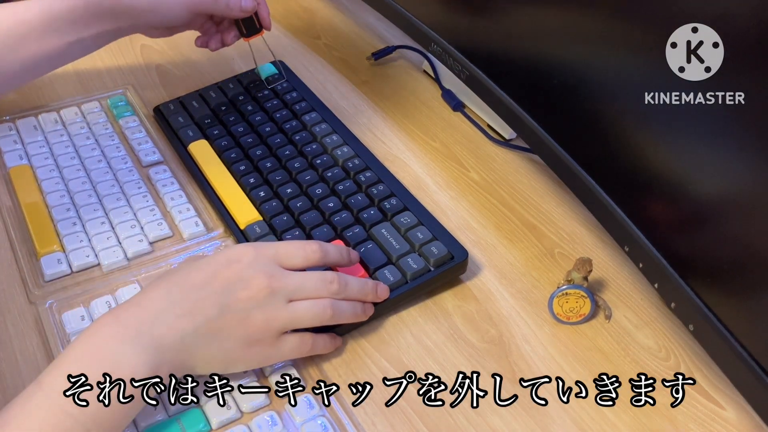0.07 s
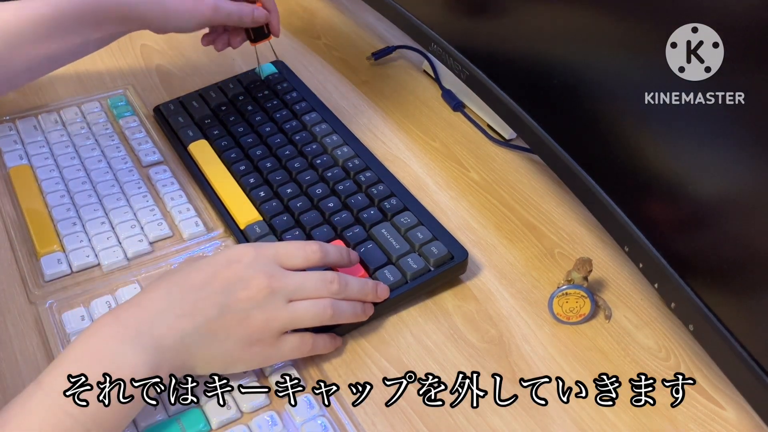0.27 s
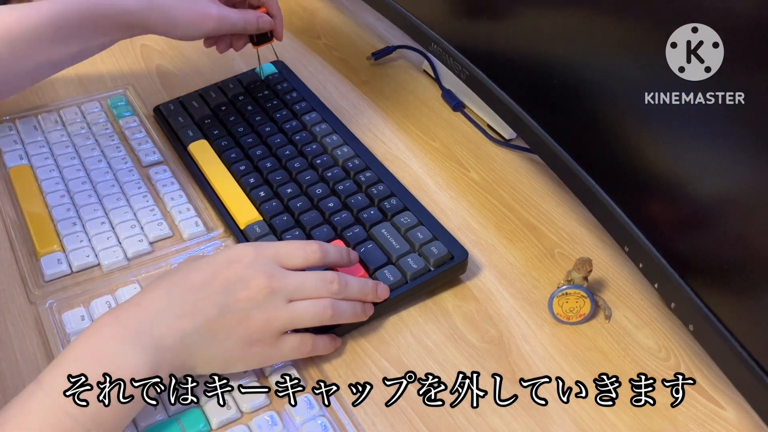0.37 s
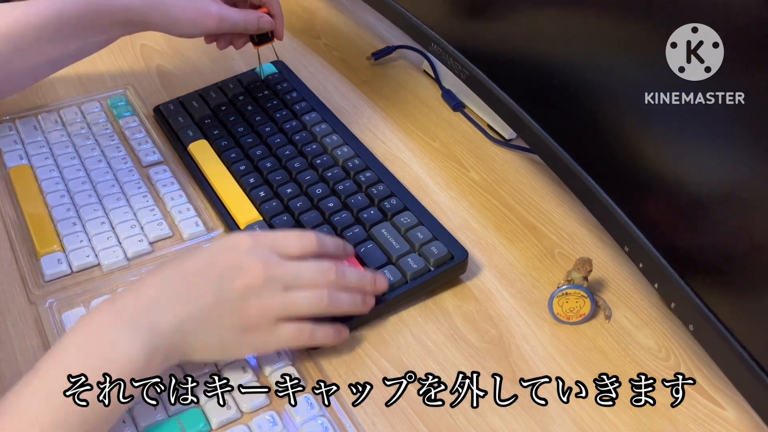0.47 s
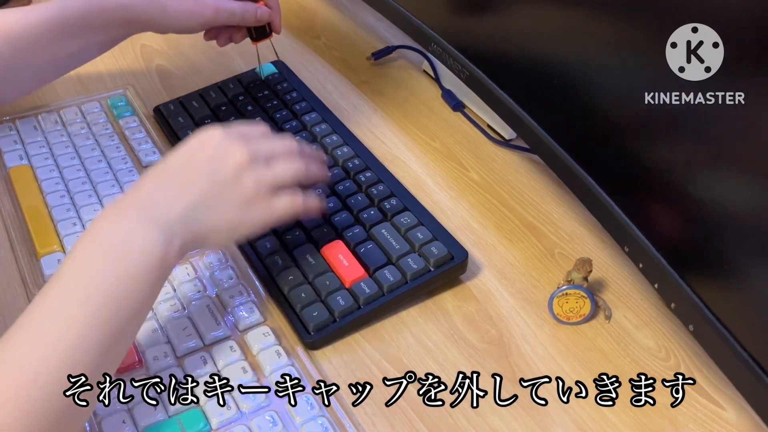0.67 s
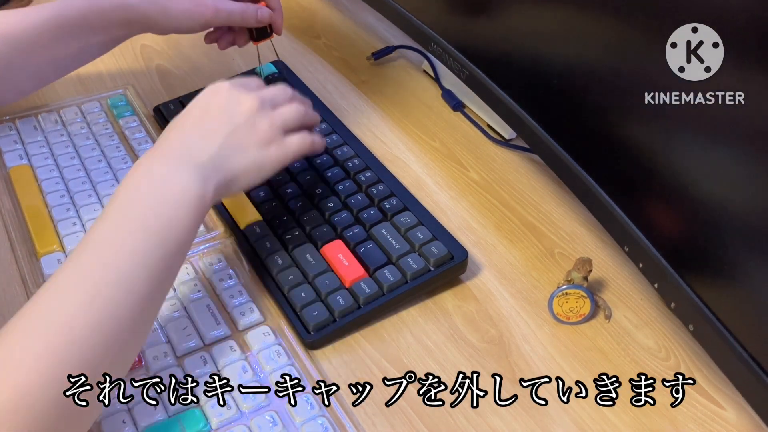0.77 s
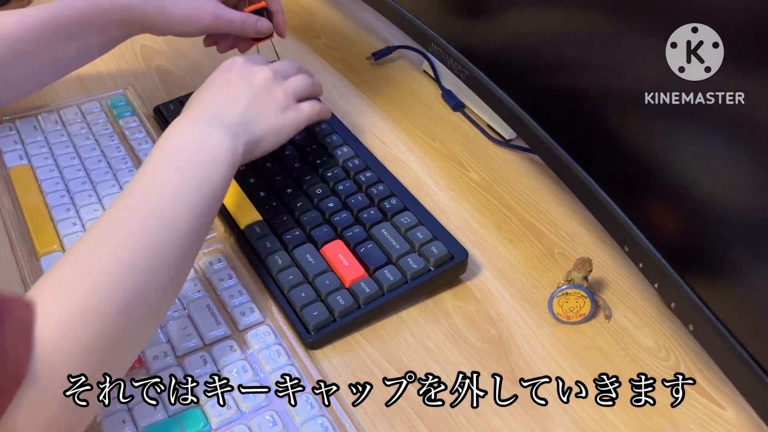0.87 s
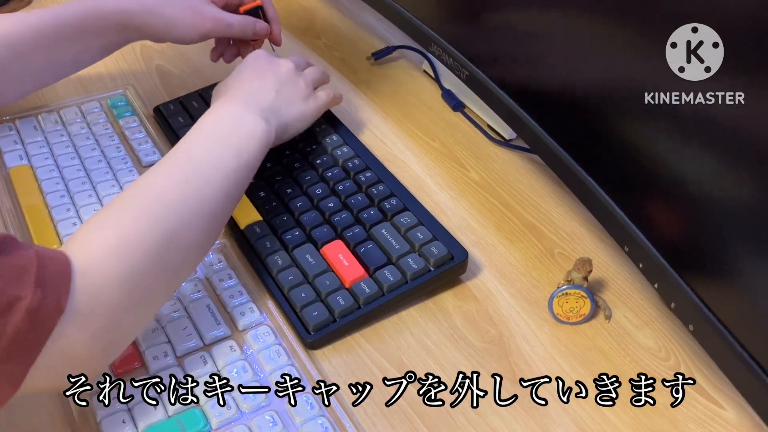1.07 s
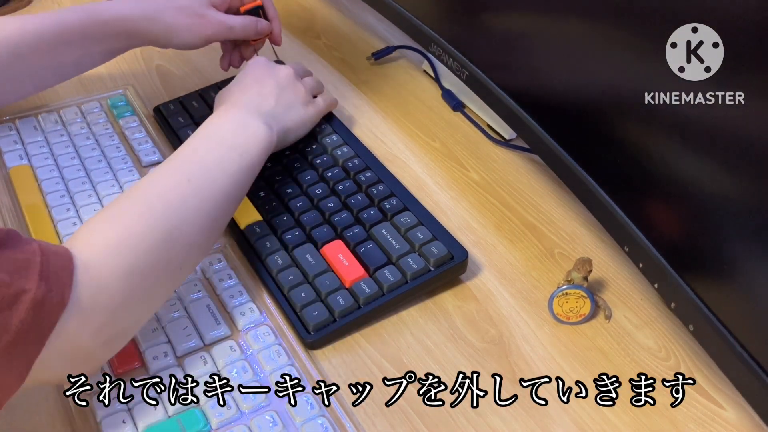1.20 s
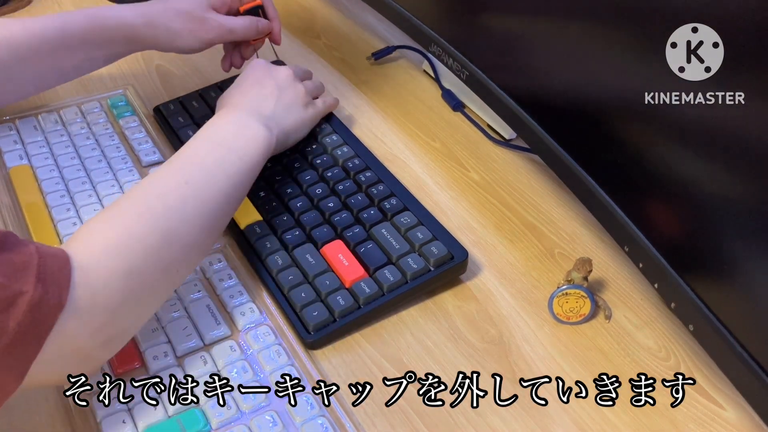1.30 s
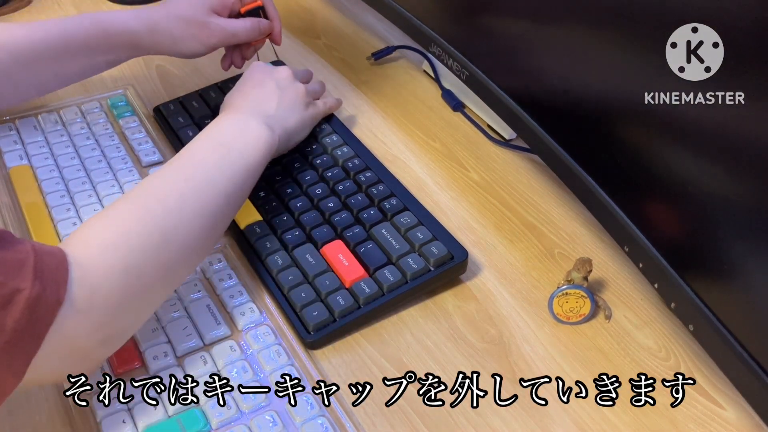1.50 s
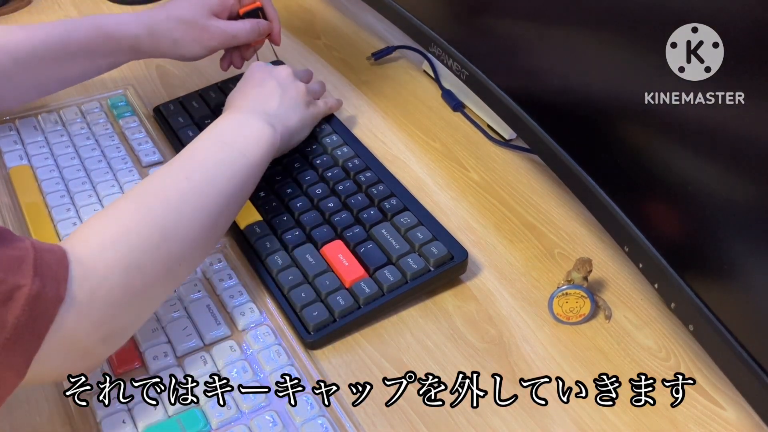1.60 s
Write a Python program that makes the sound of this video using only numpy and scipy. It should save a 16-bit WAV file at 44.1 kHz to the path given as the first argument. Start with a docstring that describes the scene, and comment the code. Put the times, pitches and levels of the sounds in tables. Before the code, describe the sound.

A keycap is pulled off a mechanical keyboard with a small knock and a sharp, bright snap. A key then clacks back with a soft desk thump, and faint taps follow, close to the microphone in a small room.

```python
"""A keycap is pulled off a mechanical keyboard on a wooden desk, near a stereo microphone in a small room.
First the keys rub and knock. At a quarter of a second the cap creaks and snaps off its stem, and the
plate under the keys rings. Just past half a second the hand lifts: a held key springs back and the case
thumps on the desk. Fingers then tap the keys lightly, and last the wire puller ticks against a cap.
The room rumbles quietly the whole time."""
import sys
import numpy as np
from scipy import signal
from scipy.fft import rfft, irfft
from scipy.io import wavfile

SR = 44100
rng = np.random.default_rng(int(sys.argv[2]) if len(sys.argv) > 2 else 0)


def file_out(sig):
    """Save sig as 16-bit WAV at sys.argv[1]."""
    # one column per channel
    cols = np.atleast_2d(sig).T
    # limit, then scale
    lim = np.clip(cols, -1, 1)
    pcm = np.round(lim * 32767).astype(np.int16)
    wavfile.write(sys.argv[1], SR, pcm)


N = 72765
LEAD = 8820  # samples made before time zero and then dropped, so a sound can begin early


def keycap():
    """The cap lets go of its stem in a few slips, each ringing the thin plastic; the plate rings on."""
    # The slips. Each row: start in seconds, level in dB, left over right in dB.
    slips = [(-.04, -18.5, -0.5), (.2352, -27, -0.5), (0.238, -14.5, 1.5), (0.2383, -6, 1),
             (0.24, -12.5, -5.5)]
    # The cap's resonances. Each row: frequency in Hz, level in dB.
    cap_body = [(300, -27), (680, -27), (850, -21.5), (1300, -8.5), (1650, -11), (2050, -18), (2700, -10.5),
                (3400, -5), (4200, -6), (5000, -9), (6050, -2), (6450, -3), (6850, 2), (7450, -7),
                (8100, 1.5), (8800, -6.5), (10600, -2.5), (12000, -9), (14000, -10), (15600, -3),
                (16500, -19)]
    # The plate's tones. Each row: frequency in Hz, level in dB, fade time in seconds.
    plate_tones = [(1003, -38, .15), (1270, -43.5, 0.11), (1475, -43, 0.058), (3370, -50.5, .17),
                   (4386, -47, .14), (5600, -46, .15), (6075, -41.5, 0.12), (7250, -38.5, .15),
                   (7055, -42.5, .15), (7486, -44, .14), (8016, -40.5, .12)]
    snaps = sum(pan(undb(db) * click(cap_body, start, rasp_db=-4, rasp_fade_s=.0077), left_db)
                for start, db, left_db in slips)
    plate = ring(plate_tones, start=.2386)
    return (space(snaps, scatter_db=-2, room_db=-4, lag_s=.00016, db_per_octave=-2)
            + space(plate, scatter_db=-8.5, room_db=-11, lag_s=.00007))


def keys():
    """Keys knock and rub on their stops; a slow finger gives more rasp than tick."""
    # The knocks. Each row: start in seconds, level in dB, pitch ratio, brightness in dB per octave,
    # left over right in dB, rasp over tick in dB.
    knocks = [(0.064, -50, 0.91, 0, 2.5, 7), (.131, -62.5, 0.94, 5, 7, 9.5),
              (0.1904, -26, 0.97, -0.5, 2, -16.5), (.231, -31.5, .92, 1, 3, 8.5),
              (.342, -54.5, 1.32, 4.5, 2.5, 7.5), (.456, -66.5, 1.1, -1, 1.5, 6),
              (0.5457, -23, 1.02, 0.26, 0.5, -21.5), (0.5493, -32.5, 0.85, 0.5, 2.5, -16.5),
              (.867, -61, 1.22, 0.5, 2, 7), (1.057, -53.5, 1.22, -5.5, 1.5, -4),
              (1.289, -64.5, 1, -2, -0.5, 5.5)]
    # The resonances of a key on its plate. Each row: frequency in Hz, level in dB.
    key_body = [(100, -18.5), (280, -7.5), (480, -12), (650, -20.5), (950, -8), (1300, -2), (1600, -0.5),
                (2050, -9.5), (2650, -8.5), (3400, -14), (4200, -15), (5000, -26.5), (6200, -22.5),
                (7800, -23), (11500, -22.5), (16000, -36.5)]
    clacks = 0
    for start, db, pitch, brightness, left_db, rasp_db in knocks:
        clack = click(key_body, start, rasp_db, rasp_fade_s=.024, pitch=pitch, db_per_octave=brightness)
        clacks += pan(undb(db) * clack, left_db)
    return space(clacks, scatter_db=-2.5, room_db=-3, lag_s=.00012, db_per_octave=.5)


def desk():
    """The case bumps the desk: each bump is a few fading swings, and the desk top rings along."""
    # The bumps. Each row: start in seconds, level in dB, pitch in Hz.
    bumps = [(-.008, -40, 116.3), (.068, -51.5, 256), (.133, -48, 200), (0.198, -47, 220),
             (0.2399, -30.5, 422), (.243, -37, 280), (.249, -32.5, 133.3), (0.5677, -29, 150),
             (0.581, -38.5, 68), (0.871, -46.5, 200), (1.305, -48, 94.5)]
    # The desk top's resonances. Each row: frequency in Hz, gain in dB, fade time in seconds.
    desk_tones = [(124, -2.5, .17), (299.8, 5.5, 0.39), (366, 8, 0.25), (486.7, 1.5, .12)]
    thumps = wood = 0
    for start, db, hz in bumps:
        cycles = since(start) * hz
        age = cycles / .55  # the bump is strongest after .55 of a cycle
        thumps += undb(db) * age * np.exp(1 - age) * np.sin(2 * np.pi * cycles)
    for hz, db, fade_s in desk_tones:
        sharpness = np.pi * hz * fade_s / np.log(1000)
        wood += undb(db) * signal.lfilter(*signal.iirpeak(hz, sharpness, SR), thumps)
    return space(thumps + wood, scatter_db=-17, room_db=-4, lag_s=.00005)


def spring():
    """The released key bounces back and its spring sings briefly."""
    # The spring's tones. Each row: frequency in Hz, relative level in dB, fade time in seconds.
    spring_tones = [(1122, 0, .06), (2180, -7, 0.028), (2425, -2, 0.056), (2570, 4.5, .035),
                    (2661, -8, 0.085), (2928, -4, .07)]
    ping = undb(-36.5) * ring(spring_tones, start=.5512)
    return space(ping, scatter_db=5, room_db=-2.5, lag_s=.0001)


def puller():
    """The puller's thin wire ticks against a plastic cap."""
    # The touches. Each row: start in seconds, level in dB, pitch ratio.
    touches = [(.154, -55, 2.65), (1.602, -47.5, 1)]
    # The resonances of wire on plastic. Each row: frequency in Hz, level in dB.
    wire_body = [(900, -31.5), (1600, -11.5), (2000, -7.5), (2600, -5), (3300, -2.5), (4000, 1),
                 (5000, -8.5), (6800, -9), (7900, -4.5), (10500, -11.5), (16000, -15)]
    ticks = sum(undb(db) * click(wire_body, start, rasp_db=-6.5, rasp_fade_s=.015, pitch=pitch)
                for start, db, pitch in touches)
    return space(ticks, scatter_db=5, room_db=-2, lag_s=.00016, db_per_octave=-.8)


def room_tone():
    """The room rumbles and hums faintly, and the microphone hisses."""
    # The rumble and hiss. Each row: frequency in Hz, relative level in dB.
    noise_shape = [(20, -35.5), (32, -23), (48, -4), (65, -9.5), (90, -12), (135, -4.5), (210, -16.5),
                   (300, -19.5), (620, -26.5), (1000, -30), (4000, -36.5), (8500, -37), (11500, -34),
                   (16000, -39.5)]
    # Their stereo width. Each row: frequency in Hz, width in dB.
    noise_width = [(30, -17.5), (150, -11), (400, -5.5), (1000, 0.5), (8000, -0.5)]
    # The hum's tones. Each row: frequency in Hz, level in dB.
    hum_tones = [(48, -67.5), (122, -78), (820, -85)]
    hz, t = np.fft.rfftfreq(N, 1 / SR), np.arange(N) / SR
    noise = irfft(stereo_noise(N, noise_width) * undb(along(noise_shape, hz)), N)
    hum = sum(np.sqrt(2) * undb(db) * np.sin(2 * np.pi * (f * t + rng.random())) for f, db in hum_tones)
    return undb(-60) * noise / noise.std() + hum


def space(sound, scatter_db, room_db, lag_s, db_per_octave=0):
    """Sound arrives directly, then scatters off the keys and desk, then echoes round the room."""
    # The room's echo. Each row: frequency in Hz, fade time in seconds.
    echo_fades = [(100, .22), (500, 0.18), (1400, .2), (3500, .22), (7000, 0.2), (14000, 0.2)]
    # Its stereo width. Each row: frequency in Hz, width in dB.
    echo_width = [(80, -17), (300, -16), (700, 4), (2000, -0.5)]
    size = 16384
    t, hz = np.arange(size) / SR, np.fft.rfftfreq(size, 1 / SR)
    scatter = irfft(stereo_noise(size, echo_width)) * fade(t, .029) * np.minimum(t / .00033, 1)
    noise, echo = stereo_noise(size, echo_width), 0
    for band_hz, fade_s in echo_fades:
        band = along([(f, f == band_hz) for f, _ in echo_fades], hz)
        echo += irfft(noise * band) * fade(t, fade_s) * rise(t, .0019)
    response = sum(undb(db) * part / np.sqrt(np.sum(part ** 2) / 2)
                   for db, part in [(scatter_db, scatter), (room_db, echo)])
    response = irfft(rfft(response) * rfft(make_filter(treble_db(hz, db_per_octave))))
    response[1, 0] += 1  # the direct sound reaches the right side first
    response[0, int(lag_s * SR)] += 1
    return signal.fftconvolve(sound * np.ones((2, 1)), response, axes=1)[:, LEAD:LEAD + N]


def click(body, start, rasp_db, rasp_fade_s, pitch=1, db_per_octave=0):
    """A sharp tick and a brief rasp of noise set an object's resonances ringing."""
    hz, t = np.maximum(np.fft.rfftfreq(2048, 1 / SR), 20), since(start)
    response = make_filter(along(body, hz / pitch) + treble_db(hz, db_per_octave))
    response *= np.sqrt(SR / 1000) / np.linalg.norm(response)  # the energy of one millisecond at level 1
    rasp = (t > 0) * fade(t, rasp_fade_s) * rng.standard_normal(len(t))
    force = undb(rasp_db) * rasp / np.linalg.norm(rasp)
    force[np.argmax(t > 0)] += 1  # the tick
    return signal.fftconvolve(force, response)[:len(t)]


def ring(tones, start):
    """A struck object's tones begin together, and each fades at its own rate."""
    t = since(start)
    ringing = sum(undb(db) * np.sin(2 * np.pi * hz * t) * fade(t, fade_s) for hz, db, fade_s in tones)
    return rise(t, .001) * ringing


def stereo_noise(size, width):
    """Spectra of left and right noise; width is how strong their opposite part is over the common part."""
    common, opposite = rfft(rng.standard_normal((2, size)))
    gain = undb(along(width, np.fft.rfftfreq(size, 1 / SR)))
    return (common + gain * opposite * np.array([[1], [-1]])) / np.sqrt(1 + gain ** 2)


def make_filter(db):
    """Turn gains in dB at evenly spaced frequencies into a filter that rings only after it is hit."""
    cepstrum = irfft(np.log(undb(db)))
    half = len(cepstrum) // 2
    cepstrum[1:half] *= 2  # fold the part before time zero onto the part after it
    cepstrum[half + 1:] = 0
    return irfft(np.exp(rfft(cepstrum)))


def treble_db(hz, db_per_octave):
    """A slope that brightens or dulls the sound above 1500 Hz."""
    return db_per_octave * np.log2(np.maximum(hz / 1500, 1))


def pan(sound, left_db):
    """Make the left side left_db louder than the right."""
    return sound * undb(np.array([[left_db], [-left_db]]) / 2)


def rise(t, rise_s):
    """Climb smoothly from 0 towards 1."""
    return 1 - np.exp(-t / rise_s)


def fade(t, fade_s):
    """Die away; the fade time is how long it takes to drop 60 dB."""
    return np.exp(-np.log(1000) * t / fade_s)


def since(start):
    """Seconds since an event, zero before it."""
    return np.maximum(np.arange(-LEAD, N) / SR - start, 0)


def along(points, hz):
    """Read between rows of frequency and value, with octaves evenly spaced."""
    freqs, values = np.array(points, float).T
    return np.interp(np.log(np.maximum(hz, 1)), np.log(freqs), values)


def undb(db):
    """Turn decibels into a gain."""
    return 10 ** (np.asarray(db) / 20)


def scene():
    """All the sounds at the desk, added together."""
    return keycap() + keys() + spring() + puller() + desk() + room_tone()


def record(dry):
    """The microphone has two dips in the treble; peaks stop at full scale and the highest treble is cut."""
    # The dips. Each row: centre in Hz, width in Hz, gain in dB.
    dips = [(9300, 462, -18.5), (13700, 710, -19)]
    hz = np.fft.rfftfreq(2048, 1 / SR)
    mic = make_filter(sum(db * np.exp(-.5 * ((hz - centre) / width) ** 2) for centre, width, db in dips))
    heard = signal.fftconvolve(dry, mic[None], axes=1)[:, :N]
    treble_cut = signal.ellip(10, .2, 70, 16100, fs=SR, output="sos")  # above 16100 Hz
    return signal.sosfilt(treble_cut, np.clip(heard, -1, 1))


dry = scene()
out = record(dry)
file_out(out)
```